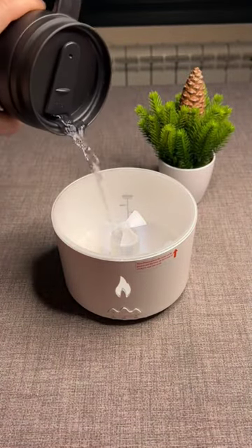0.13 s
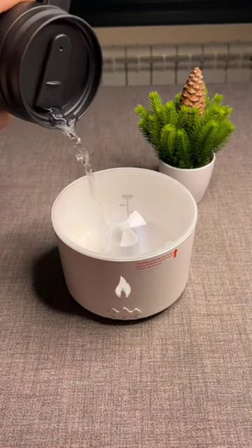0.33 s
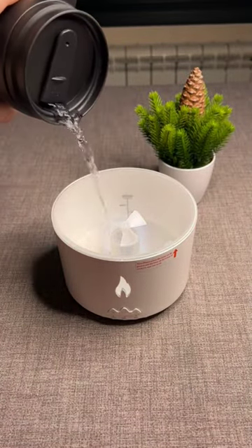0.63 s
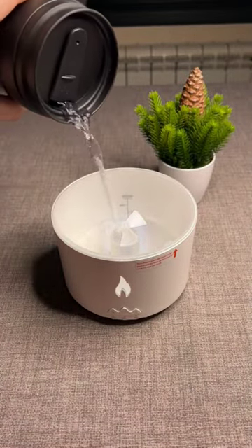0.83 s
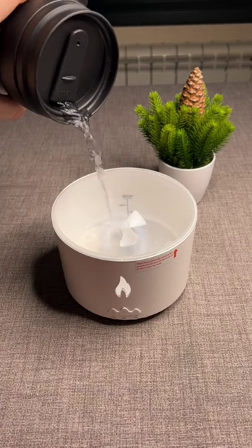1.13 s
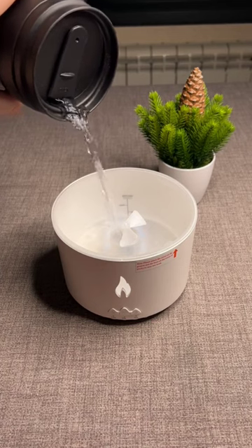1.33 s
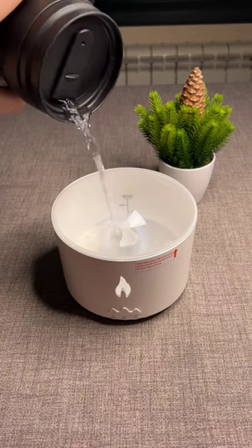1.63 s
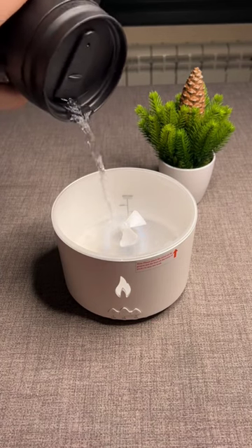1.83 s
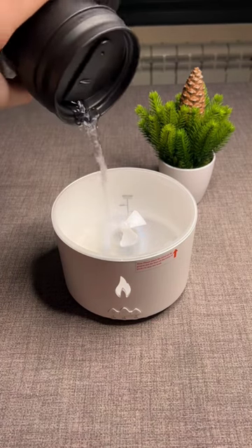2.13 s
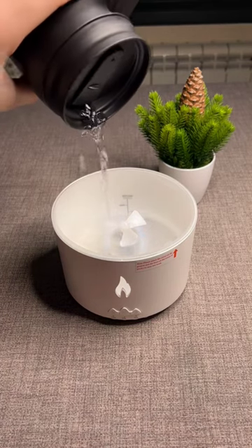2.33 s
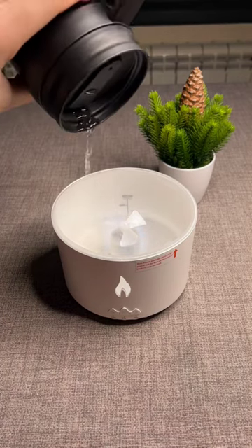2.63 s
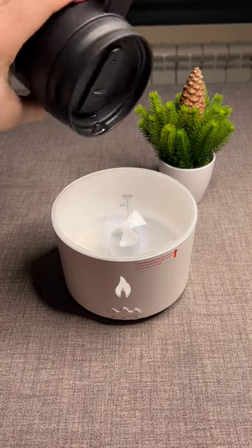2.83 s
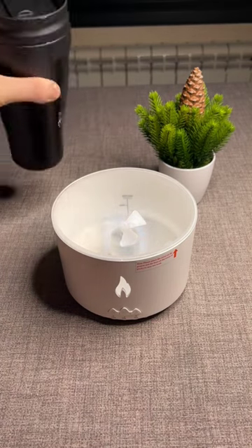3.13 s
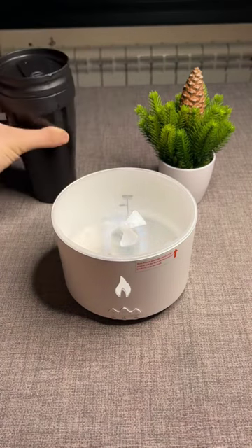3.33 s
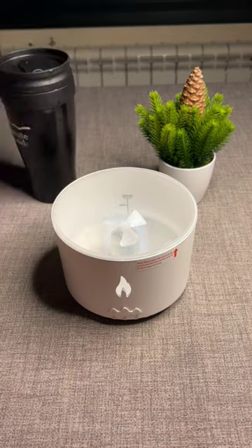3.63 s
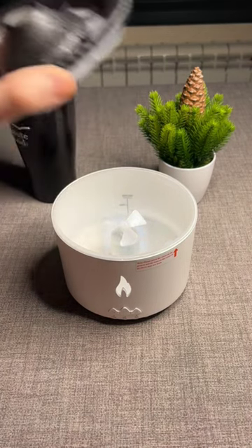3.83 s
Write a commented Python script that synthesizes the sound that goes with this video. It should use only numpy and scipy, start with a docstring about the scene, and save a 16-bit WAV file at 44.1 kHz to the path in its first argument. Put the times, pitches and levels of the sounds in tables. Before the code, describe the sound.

Water pours from a tumbler into a small plastic tank, splashing and bubbling unevenly. The pour stops, then the tumbler lands on the table with a low thud and a hand rustles faintly. Close microphone, quiet room.

```python
"""Water splashing from a tumbler into a plastic tank, on a table in a quiet room, phone microphone close by.
Each splash rings the tank wall and leaves short bubble tones over a fizz, while the tank drums low. The pour
stops after three seconds. The tumbler scuffs and is set down with a thud that rings the table top, and a hand
rustles nearby."""
import sys
import numpy as np
from scipy import signal
from scipy.fft import rfft, irfft, next_fast_len
from scipy.io import wavfile
from scipy.ndimage import uniform_filter1d, map_coordinates

SR = 44100
rng = np.random.default_rng(int(sys.argv[2]) if len(sys.argv) > 2 else 0)


def digitize_waveform(pressure):
    """Quantize a signal to 16-bit integers and store it at the path in sys.argv[1].

    Rows of a 2-D input are taken as channels; values are limited to [-1, 1].
    """
    field = np.atleast_2d(pressure).T
    bounded = np.clip(field, -1, 1)
    quanta = np.round(bounded * 32767).astype(np.int16)
    wavfile.write(sys.argv[1], SR, quanta)


N = 176400
T = np.arange(N) / SR

# Strength of the stream: time_s, fizz_db, burble_db, drum_db
POUR_LEVELS = [(0, -79, -71, -53.5), (.22, -67, -70, -53), (.7, -55, -60.5, -48), (.8, -61, -52.5, -52),
               (1.02, -53.5, -66, -51), (1.13, -65, -66.5, -55.5), (1.42, -64.5, -74.5, -53.5),
               (1.55, -63.5, -62, -57.5), (1.7, -65, -56, -47), (1.76, -62, -64.5, -57.5),
               (2.04, -76, -78, -59.5), (2.12, -70, -68, -62.5), (2.33, -57.5, -63.5, -67),
               (2.62, -64.5, -67.5, -60.5), (2.759, -66, -83, -66), (2.831, -55.5, -53.5, -55),
               (2.969, -76.5, -69, -54), (3.01, -90.5, -81.5, -71)]
# Noise colours of the water, the tank and the room: frequency_hz, relative_density_db
FIZZ_SPECTRUM = [(3000, -10.5), (5000, -3), (7000, 3.5), (11500, 4.5), (15600, -4)]
BURBLE_SPECTRUM = [(500, -11.5), (850, -3.5), (1400, -12.5), (2100, 0.5), (3500, -2.5), (6000, -3.5),
                   (9000, -33)]
DRUM_SPECTRUM = [(25, -5.5), (75, -10), (130, 5), (180, -13.5), (400, -16.5), (1000, -33.5)]
ROOM_SPECTRUM = [(60, -7.5), (136, 5.5), (330, -16), (3000, -29), (6600, -32.5), (7560, -24.5), (9000, -37),
                 (15600, -38.5)]
# Tank wall resonances, early and late in the pour: pitch_hz, width_hz, gain_db
EARLY_MODES = [(1877, 50, -3), (4526, 68, -2), (5890, 73, -2)]
LATE_MODES = [(860, 160, -9.5), (2076, 107, -6)]
# Lumps of water landing: start_s, level_db, pitch_hz, spray_offset_db, slap_offset_db
SPLASH_EVENTS = [(0.042, -48.5, 3800, -31, -3), (0.276, -40, 4580, -16.5, -15),
                 (0.418, -38, 6080, -22.5, -28), (0.494, -40.5, 4700, -6, -19.5),
                 (0.717, -43, 3450, -12, -12), (0.736, -40.5, 6350, -5, -14),
                 (0.764, -33, 5720, -18, -11.5), (0.784, -41, 4650, -13.5, -13),
                 (0.807, -34, 4350, -10.5, -21), (0.853, -32, 4300, -13, -6), (0.897, -44, 3600, -14, -59),
                 (0.929, -38.5, 4500, -13.5, -21), (0.974, -34.5, 2070, -18.5, -15),
                 (1.072, -46, 4320, -16.5, -2), (1.165, -45, 1850, -30, -31),
                 (1.212, -41.5, 4540, -16.5, -2), (1.337, -41, 2080, -15, -13.5),
                 (1.385, -42, 4700, -35, -21), (1.563, -37, 2150, -5, -8.5), (1.611, -32.5, 1860, -26, -20),
                 (1.642, -44, 1900, -16, 2), (1.666, -26, 2010, -19.5, -32), (1.68, -30.5, 1940, -21, -18),
                 (1.693, -31, 1800, -19.5, -14), (1.704, -37, 1030, -32, -9.5),
                 (1.731, -43, 3820, -17, -3.5), (1.806, -45, 1910, 0, -10), (2.036, -47.5, 1180, -33, -26),
                 (2.104, -29.5, 2215, -22.5, -19), (2.142, -43, 7800, -0.5, -32),
                 (2.178, -33, 10750, -11, -7.5), (2.268, -39.5, 2170, -1.5, -25),
                 (2.333, -43, 5870, -3.5, -6), (2.439, -36, 2840, -15, -13), (2.531, -38, 2220, -4.5, -37),
                 (2.573, -42.5, 3920, -29, -13.5), (2.665, -39, 6060, -14.5, -38),
                 (2.824, -36.5, 2020, -21, -16), (2.915, -36, 660, -6.5, -35),
                 (2.941, -36.5, 1180, -21, -10.5), (2.966, -44, 11700, 0.5, -10)]
# Small taps: start_s, level_db, pitch_hz
TAPS = [(3.3243, -64, 2450), (3.7518, -51.5, 1700)]
# Scuff and hand movements: the first row is the tumbler scuffing just before it lands, the others are the hand;
# start_s, length_s, level_db, slide_offset_db
RUSTLE_STROKES = [(3.479, 0.047, -67.5, 28.5), (3.704, 0.081, -69.5, 10), (3.816, .2, -78, 23)]
# The hand's hiss and the low slide under it: frequency_hz, relative_density_db
RUSTLE_SPECTRUM = [(1200, -10.5), (2200, -9.5), (15600, -33.5)]
SLIDE_SPECTRUM = [(25, 5.5), (190, -4), (400, -11), (1200, -34.5)]
# The tumbler's rim touches, then its base lands: start_s, level_db
TUMBLER_CONTACTS = [(3.491, -40), (3.5011, -15.5)]
# Table top resonances: pitch_hz, level_db, t60_s
TABLE_MODES = [(138, -13.5, 0.43), (183.5, -5, 0.21), (248.5, -5, 0.16), (329.6, -10, 0.18),
               (526, -11.5, 0.1)]
# Likeness of left and right at the microphone: frequency_hz, correlation
STEREO_LIKENESS = [(60, 1), (300, 0.937), (1000, 0.52), (4000, 0.82), (12000, 0.66)]

RING_CHANGE_S = 2.05  # from here the tank's ring changes abruptly to lower, broader resonances


def amp(db):
    """Gain of a level in dB."""
    return 10 ** (np.asarray(db) / 20)


def unit(x):
    """Scaled to rms 1."""
    return x / np.sqrt(np.mean(x ** 2) + 1e-20)


def along(points, hz):
    """Interpolate (frequency_hz, value) points on a log axis."""
    f, values = np.transpose(points)
    return np.interp(np.log(hz + 1), np.log(f + 1), values)


def wobble(knots_per_s):
    """A smooth random curve."""
    return map_coordinates(rng.standard_normal(int(N * knots_per_s / SR) + 4), [T * knots_per_s])


def filtered(x, response):
    """x through a complex frequency response."""
    size = next_fast_len(N + SR // 2)
    return irfft(rfft(x, size) * response(np.fft.rfftfreq(size, 1 / SR)), size)[..., :N]


def colour(spectrum):
    """Response that follows a spectrum and cuts away beyond its ends."""
    low_hz, top_hz = spectrum[0][0] / 2, spectrum[-1][0]
    return lambda f: amp(along(spectrum, f)) * (f > low_hz) * np.minimum(1, (top_hz / (f + 1)) ** 6)


def stereo_noise(response):
    """Coloured noise of rms 1, the two sides partly alike."""
    def mid_and_side(f):
        angle = np.arccos(np.clip(along(STEREO_LIKENESS, f), -1, 1)) / 2
        return response(f) * [np.cos(angle), np.sin(angle)]
    mid, side = filtered(rng.standard_normal((2, N)), mid_and_side)
    return unit(np.array([mid + side, mid - side]))


def patchy(pair, depth_db):
    """Noise given random gain patches in time and frequency."""
    bins = signal.stft(pair, nperseg=256)[2]
    patches = uniform_filter1d(rng.standard_normal(bins.shape[1:]), size=10, axis=0)
    patches = unit(uniform_filter1d(patches, size=5, axis=1))
    return unit(signal.istft(bins * amp(depth_db * patches), nperseg=256)[1][:, :N])


def add(track, start_s, x):
    """Mix x into the track."""
    k = round(start_s * SR)
    part = track[max(k, 0):max(k + len(x), 0)]
    part += x[max(-k, 0):][:len(part)]


def tank_wall(f, modes):
    """Response of the plastic wall: resonances of alternating sign."""
    return sum((-1) ** k * amp(db) * 1j * f * width / (hz * hz - f * f + 1j * f * width)
               for k, (hz, width, db) in enumerate(modes))


def slosh(tracks, delay_s=0.000298):
    """The moving surface bends the wall's pitch, here by a wavering delay."""
    read_at = np.arange(N) + delay_s * SR * wobble(25)
    return np.array([map_coordinates(x, [read_at], mode="nearest") for x in tracks])


def burble(wall_db=19):
    """Churning water, coloured by the tank wall."""
    early, late = [
        stereo_noise(lambda f: colour(BURBLE_SPECTRUM)(f) * np.abs(1 + amp(wall_db) * tank_wall(f, m)))
        for m in (EARLY_MODES, LATE_MODES)]
    return patchy(slosh(np.where(T < RING_CHANGE_S, early, late)), depth_db=4.5)


def droplets(clumps_db, count=3000, centre_hz=3115, spread_db=3.5, decay_cycles=1.85):
    """Tiny drops, each a ping that dies within a few cycles."""
    when, pitch, size = rng.random((count, 3)).T
    samples = np.arange(256)
    t = samples / SR
    starts = (when * (N - len(t))).astype(int)
    octaves = 0.4235 * np.log(pitch / (1 - pitch))
    hz = np.clip(centre_hz * 2 ** octaves, 600, 15000)[:, None]
    gain = amp(-spread_db * np.log(size + 0.002) + clumps_db[starts])[:, None]
    pings = gain * np.sin(2 * np.pi * hz * t) * np.exp(-t * hz / decay_cycles) * (1 - np.exp(-t * hz))
    return unit(np.bincount((starts[:, None] + samples).ravel(), pings.ravel(), N))


def crackle(ticks_per_s=90, fall_s=0.00097, tick_db=6):
    """Gain on the fizz that jumps with each tiny burst of spray."""
    ticks = (rng.random(N) < ticks_per_s / SR) * rng.random(N)
    return 1 + amp(tick_db) * signal.lfilter([1], [1, -np.exp(-1 / (fall_s * SR))], ticks)


def pour():
    """Fizz, burble and the tank's low drumming follow the stream; the droplets are returned apart."""
    times, *levels = np.transpose(POUR_LEVELS)
    fizz_gain, burble_gain, drum_gain = [amp(np.interp(T, times, db, right=-120)) for db in levels]
    clumps_db = 1.33 * wobble(16) + 2.77 * wobble(45.28)
    fizz = fizz_gain * patchy(stereo_noise(colour(FIZZ_SPECTRUM)), depth_db=4.0)
    churn = burble_gain * burble()
    drops = burble_gain * amp(-6) * droplets(clumps_db)
    drum = drum_gain * amp(1.76 * wobble(18)) * stereo_noise(colour(DRUM_SPECTRUM))
    return (fizz * crackle() + churn) * amp(clumps_db) + drum, drops


def room_tone(level_db=-71):
    """The quiet room: steady noise with a low hum."""
    return amp(level_db) * stereo_noise(colour(ROOM_SPECTRUM))


def bubble_cloud(pitch_hz, samples, second_db=-10):
    """Like-sized bubbles ring in a narrow band; a second size adds a weaker one."""
    f = np.fft.rfftfreq(samples, 1 / SR)
    band = lambda hz: 1 / (1 + ((f - hz) / (0.04 * (hz + 2000))) ** 2)
    bands = band(pitch_hz) + amp(second_db) * band(pitch_hz * 2 ** rng.uniform(-1.1, 1))
    return unit(irfft(rfft(rng.standard_normal(samples)) * bands, samples))


def splashes(fall_s=0.0045, rise_share=0.5):
    """Lumps of water swell and burst. Returns spray with slap, and bubbles with the wall's ring."""
    spray, slap, blows, bubbles = np.zeros((4, N))
    t = np.arange(-SR // 20, SR // 10) / SR
    burst = lambda decay_s: np.exp(np.where(t < 0, t / rise_share, -t) / decay_s)
    for start_s, db, hz, spray_db, slap_db in SPLASH_EVENTS:
        at_s = start_s + rise_share * fall_s + t[0]
        first_contact = amp(3) * burst(fall_s / 10)
        add(bubbles, at_s, amp(db - 10) * burst(fall_s * 1.74) * bubble_cloud(hz, len(t)))
        add(blows, at_s, amp(db + 4) * burst(fall_s))
        add(spray, at_s, amp(db + spray_db - 6) * (burst(fall_s) + burst(fall_s / 4)))
        add(slap, at_s, amp(db + slap_db - 6) * (burst(fall_s) + first_contact))
    blows *= rng.standard_normal(N)
    wall = filtered(blows * (T < RING_CHANGE_S), lambda f: tank_wall(f, EARLY_MODES))
    wall += filtered(blows * (T >= RING_CHANGE_S), lambda f: tank_wall(f, LATE_MODES))
    ragged = amp(4.4 * np.tanh(wobble(300)))
    spray = spray * patchy(stereo_noise(colour(FIZZ_SPECTRUM)), depth_db=4.5)
    slap = slap * stereo_noise(colour(BURBLE_SPECTRUM))
    return ragged * (spray + slap), bubbles + slosh([wall])[0]


def reflections(x, t60_s=0.08):
    """A short answer from the tank and nearby walls, different on each side of the microphone."""
    t = np.arange(SR // 4) / SR
    tail = rng.standard_normal((2, len(t))) * amp(-60 * t / t60_s)
    return signal.fftconvolve(x[None], tail / np.linalg.norm(tail[0]), axes=1)[:, :N]


def small_taps(t60_s=0.015):
    """A faint tap before the thud and one after, each a damped tone with a little noise."""
    track, t = np.zeros(N), np.arange(SR // 2) / SR
    for start_s, db, hz in TAPS:
        tone = np.sin(2 * np.pi * hz * t) + 0.084 * rng.standard_normal(len(t))
        add(track, start_s, amp(db - 60 * t / t60_s) * tone)
    return track


def scuff_and_rustle():
    """The tumbler scuffs just before it lands, then fingers and sleeve brush over things nearby: soft hiss with
    a low slide under it."""
    hiss, slide = np.zeros((2, N))
    for start_s, length_s, db, slide_db in RUSTLE_STROKES:
        progress = np.linspace(0, 1, round(length_s * SR))
        flat_top = np.clip(np.minimum(progress, 1 - progress) * 8, 0, 1)
        add(hiss, start_s, amp(db) * np.sin(np.pi * progress) ** 2)
        add(slide, start_s, amp(db + slide_db) * flat_top)
    return hiss * stereo_noise(colour(RUSTLE_SPECTRUM)) + slide * stereo_noise(colour(SLIDE_SPECTRUM))


def table_ring(t, rise_s=0.011, step_turns=0.0074):
    """The struck table top rings low, each mode wandering a little in phase."""
    ring = np.zeros(len(t))
    for hz, db, t60_s in TABLE_MODES:
        wander = np.cumsum(rng.normal(0, step_turns, len(t)))
        wander = uniform_filter1d(uniform_filter1d(wander, SR // 400), SR // 400)
        ring += amp(db - 60 * t / t60_s) * np.sin(2 * np.pi * (hz * t + wander))
    return ring * (1 - np.exp(-(t / rise_s) ** 2))


def tumbler_thud(start_hz=570, end_hz=140.3, glide_s=0.0029, rise_s=0.0018, t60_s=0.053):
    """Rim, then base, meet the table: each sends a falling thump through the top and sets it ringing."""
    track, t = np.zeros(N), np.arange(SR // 2) / SR
    hz = end_hz + (start_hz - end_hz) * np.exp(-t / glide_s)
    envelope = amp(-60 * t / t60_s) * (1 - np.exp(-t / rise_s))
    thump = -np.sin(2 * np.pi * np.cumsum(hz) / SR) * envelope
    for start_s, db in TUMBLER_CONTACTS:
        add(track, start_s, amp(db) * (1.72 * thump + amp(-9.5) * table_ring(t)))
    return track


def scene():
    """Water, tumbler and hand at close range, over the room tone."""
    stream, drops = pour()
    splash_noise, splash_tones = splashes()
    pings = drops + splash_tones
    knocks = tumbler_thud() + small_taps()
    room = room_tone()
    water = stream + splash_noise + pings + amp(-10) * reflections(pings)
    table = knocks + amp(-12.5) * reflections(knocks)
    return water + table + scuff_and_rustle() + room


def record(dry):
    """The phone microphone thins the deepest bass and keeps nothing above its band limit."""
    bass_hz, top_hz = 45, 15800
    return filtered(dry, lambda hz: (hz < top_hz) * (1j * hz / (bass_hz + 1j * hz)) ** 2)


dry = scene()
out = record(dry)
digitize_waveform(out)
```